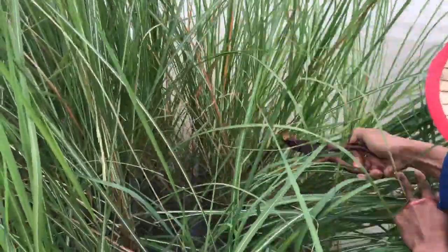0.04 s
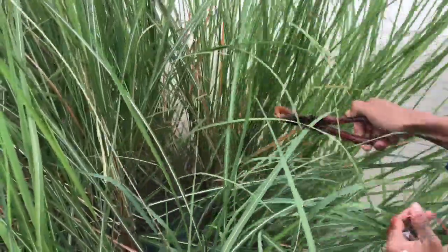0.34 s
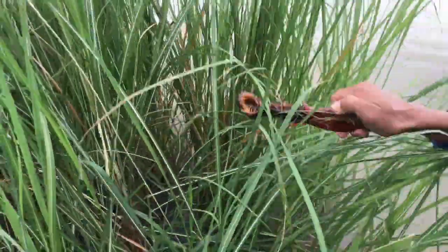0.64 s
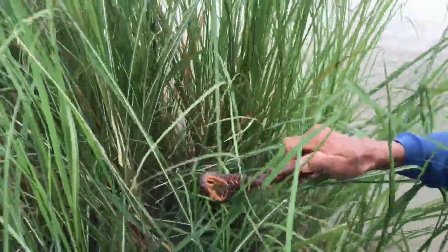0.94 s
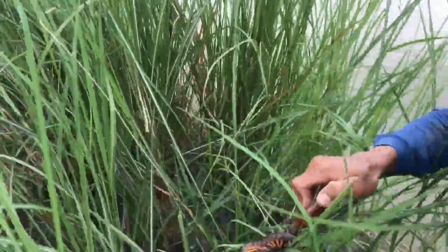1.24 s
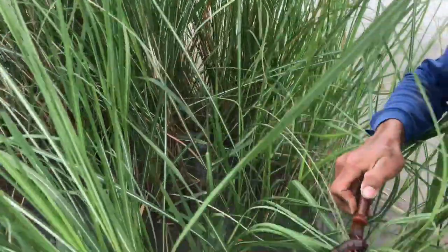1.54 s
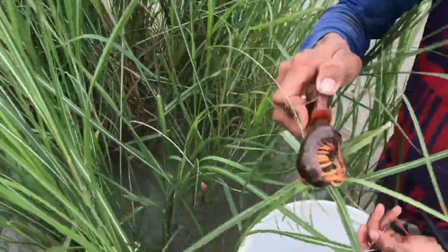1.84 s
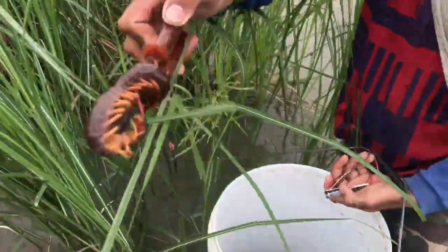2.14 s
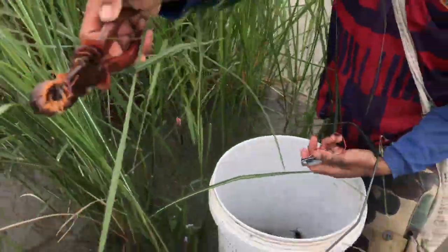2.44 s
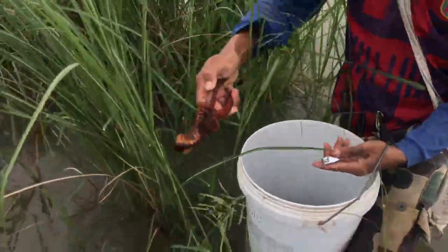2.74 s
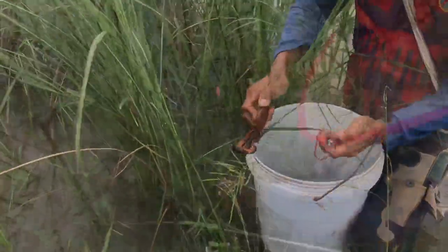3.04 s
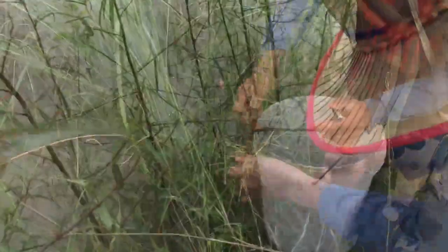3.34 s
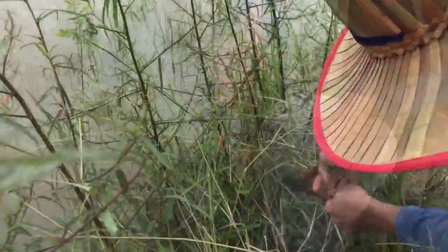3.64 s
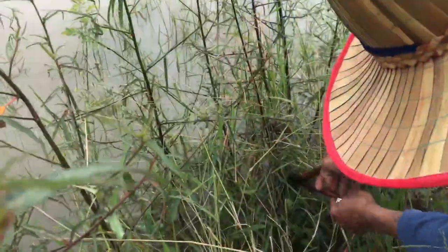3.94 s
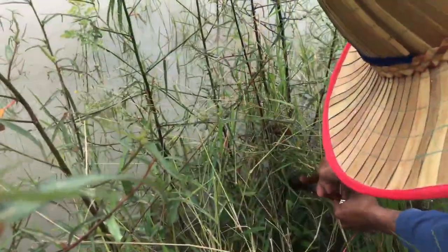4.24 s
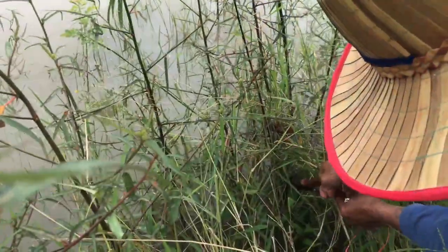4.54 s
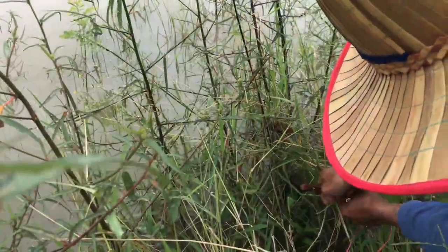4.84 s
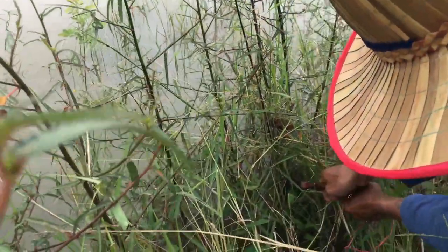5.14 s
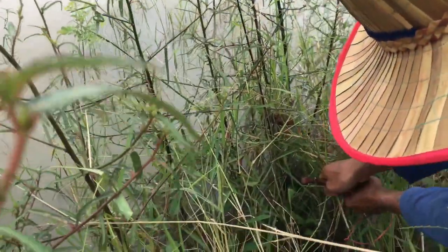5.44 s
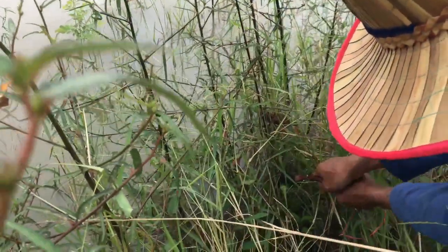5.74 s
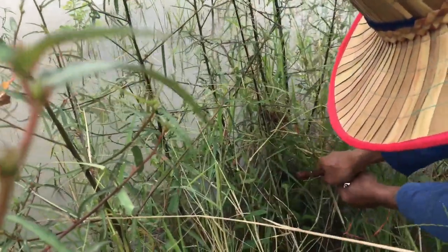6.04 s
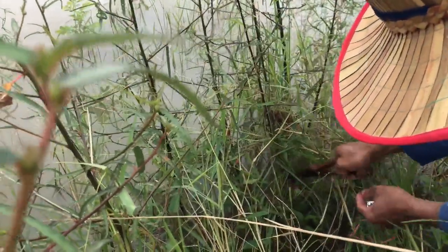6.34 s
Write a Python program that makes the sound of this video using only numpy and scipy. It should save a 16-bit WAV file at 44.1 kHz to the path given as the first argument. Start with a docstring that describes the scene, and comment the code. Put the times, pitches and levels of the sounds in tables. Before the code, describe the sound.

Close hiss of grass blades, snapping stems and splashing wading steps, fading to quiet ticks of hands probing a clump.

```python
"""Tall wet grass, close up in a flooded field, as someone wading draws metal tongs out of it.
Blades catch on each other and hiss past, stems snap, and water splats and plops round the legs.
Then hands probe a quieter clump: small stems crackle, an insect's wings tick, and something
wet sticks and slips in one squeak. One close mono microphone in the open, with light wind
and handling rumble on it."""
import sys
import numpy as np
from scipy import signal
from scipy.fft import rfft, irfft, next_fast_len
from scipy.io import wavfile
from scipy.ndimage import uniform_filter1d, map_coordinates

SR = 44100
rng = np.random.default_rng(int(sys.argv[2]) if len(sys.argv) > 2 else 0)


def generate_wav(sig):
    """Save sig (samples, or channels by samples) to the path in sys.argv[1] as 16-bit PCM at SR."""
    pcm = np.round(np.clip(np.atleast_2d(sig).T, -1, 1) * 32767).astype(np.int16)
    wavfile.write(sys.argv[1], SR, pcm)


N = 282240

# Levels in the tables are relative: each source applies its own gain.
# Steady push of blade on blade. Each row: time in seconds, level in dB.
BLADE_PUSH = [(0.0, -49.5), (1.35, -55), (1.89, -48.5), (2.16, -54.5), (2.44, -58.5), (2.65, -61),
              (2.85, -57), (3.17, -62.5), (3.3, -63), (3.9, -73.5), (4.56, -73.5), (4.79, -70.5),
              (5.2, -80.5), (5.81, -72), (5.93, -69), (6.4, -67.5)]
# Quick strokes through the grass. Each row: middle in seconds, level in dB, length in seconds.
GRASS_STROKES = [(0.138, -52, .08), (0.282, -53, 0.116), (0.539, -50, 0.045), (0.817, -54, 0.019),
                 (0.957, -54.5, 0.067), (1.363, -53.5, 0.052), (2.315, -54, .1), (2.807, -57.5, 0.33),
                 (2.893, -50, 0.036), (3.166, -54.5, .05), (3.255, -54, 0.018), (3.32, -53, 0.035),
                 (3.764, -64.5, 0.035), (5.897, -59, 0.088), (6.277, -66, .05)]
# Colour of sliding blades. Each row: frequency in Hz, level in dB.
BLADE_SPECTRUM = [(150, 12.5), (500, -3), (950, -3), (1500, 1.5), (2500, 2), (3700, 3.5), (6000, 1.5),
                  (9000, 2), (12500, 2), (15300, 1.5)]
# Sharp cracks: stems snapping and a few wet splats of water.
# Each row: start in seconds, level in dB, lower band edge in Hz.
SHARP_CRACKS = [(1.719, -34, 1500), (1.8313, -28.5, 6900), (1.9075, -27.5, 700), (2.0183, -22, 2960),
                (2.152, -24.5, 4380), (2.16, -23, 4000), (2.175, -28, 5000), (2.2145, -24.5, 4400),
                (3.144, -33, 1000), (4.7765, -45, 8000), (4.851, -45, 6000), (5.114, -34, 8450),
                (5.373, -46, 6000), (5.428, -45.5, 5000), (5.4819, -47, 7000), (5.531, -47.5, 7000),
                (5.817, -38, 6000), (5.9194, -40, 6000), (5.957, -41.5, 8000), (6.093, -41, 3500),
                (6.16, -38.5, 1500)]
# The largest air pockets. Each row: start in seconds, level in dB, pitch in Hz,
# cycles to fade by 60 dB, glide over that time as a share of the pitch.
AIR_POCKETS = [(1.718, -41.5, 1770, 45, 0.3), (1.79, -43, 1127, 53, 0.065), (1.817, -44, 452, 29, -0.065),
               (1.847, -33.5, 1480, 20, 0), (1.9075, -34.5, 2130, 28, 0.11), (1.91, -40.5, 678, 57, -0.35),
               (2.232, -42, 1630, 34, -0.093), (2.3412, -40, 1830, 42, 0), (3.008, -47.5, 1336, 140, .07),
               (3.022, -43, 896, 35, -.25), (3.1, -43, 1576, 42, 0.18), (3.1216, -39.5, 2420, 100, 0),
               (3.123, -37, 1070, 17, 0), (3.1426, -32, 913, 28, -0.27), (3.191, -43.5, 2630, 55, 0.037),
               (3.231, -43.5, 1170, 30, -.1), (3.243, -43, 6760, 95, 0.48), (3.283, -45, 512, 29, 1),
               (3.2944, -28.5, 769, 28, 0.82), (3.31, -45, 1397, 84, 0.36),
               (3.327, -39.5, 2760, 36, -0.038), (3.424, -46, 2190, 52, 0.2),
               (3.4534, -44.5, 2830, 37, -0.039), (3.5416, -51.5, 4900, 48, 0),
               (3.6252, -53.5, 2440, 130, -0.059)]
# Colour of a splash. Each row: frequency in Hz, level in dB.
SPLASH_SPECTRUM = [(300, -20), (1200, -5), (3000, -10), (6000, -12), (12000, -27)]
# A leg shoves the water. Each row: middle in seconds, level in dB, length in seconds.
LEG_SLOSHES = [(.75, -56, 0.18), (1.274, -57, 0.18), (1.737, -59, 0.083), (1.896, -57, 0.14),
               (2.221, -58, .1), (3.044, -49.5, 0.047), (3.154, -55, .06), (3.331, -57.5, .04),
               (3.443, -55, 0.054)]
# Water lapping round the legs. Each row: time in seconds, level in dB.
LAPPING = [(0.0, -62), (1.23, -57), (1.94, -56.5), (2.53, -64), (3.26, -55.5), (3.48, -65.5), (3.9, -85)]
# Colour of stirred water. Each row: frequency in Hz, level in dB.
WATER_SPECTRUM = [(200, 10), (340, 6), (480, -10.5), (700, -5.5), (950, 6.5), (1200, 0), (1800, 0.5),
                  (3000, 0.5), (6000, -30), (12000, -39)]
# Dull knocks. Each row: start in seconds, level in dB, pitch in Hz, seconds to fade by 60 dB.
KNOCKS = [(.948, -34.5, 207, 0.059), (0.9498, -31.5, 617, 0.013), (2.078, -38.5, 95, 0.099),
          (2.149, -36, 220, 0.044), (2.166, -27.5, 137, 0.037), (2.215, -34, 108, 0.035),
          (2.441, -41.5, 260, 0.076), (5.599, -43, 66, 0.16), (5.891, -39, 82, .077),
          (6.061, -42.5, 59.6, .094)]
# Ring of something hollow. Each row: frequency in Hz, level in dB, seconds to fade by 60 dB.
HOLLOW_MODES = [(700, -40.5, .022), (1350, -42, 0.021), (1770, -43, .014), (2230, -42, .015)]
# Bursts of an insect's wings. Each row: start in seconds, level in dB, length in seconds.
WING_BURSTS = [(4.885, -56, .04), (4.957, -52, 0.043)]
# Harmonics of the squeak. Each row: multiple of the pitch, level in dB.
SQUEAK_HARMONICS = [(1, -10.5), (2, 0), (3, -19)]
# Wind on the microphone. Each row: time in seconds, level in dB.
GUSTS = [(0.0, -54.5), (0.75, -53), (1.5, -50.5), (1.69, -54.5), (1.99, -48), (3.8, -57), (4.04, -54),
         (6.04, -54.5), (6.4, -55)]
# Colour of that wind. Each row: frequency in Hz, level in dB.
WIND_SPECTRUM = [(25, -59), (31, -34), (42, -5), (62, -2), (85, 0.5), (105, -4), (135, -1), (180, -8.5),
                 (280, -10.5), (400, -21.5), (600, -34), (1500, -48)]
# Murmur of open country. Each row: frequency in Hz, level in dB.
COUNTRY_SPECTRUM = [(100, -9), (300, 0), (500, -3), (800, -6.5), (1300, -10.5), (2200, -17.5), (5000, -20),
                    (15000, -19.5)]
# Notches of the microphone port. Each row: centre in Hz, width in Hz, depth in dB.
PORT_NOTCHES = [(4920, 170, 6.5), (7640, 340, 4), (10500, 670, 6.5)]


def grass(level_db=3, catches_per_s=3000, slips_per_s=60, crackle_db=-14.5):
    """Toothed blade edges catch on each other: a harder push makes more catches, merging into hiss."""
    push_db = with_strokes(curve(BLADE_PUSH), GRASS_STROKES)
    push = amp(push_db - push_db.max())
    catch_rate = catches_per_s * push
    teeth = unit(clicks(catch_rate, spread_db=-1) / np.sqrt(catch_rate))
    sliding = unit(rng.standard_normal(N) + teeth)
    # a whole blade slips free with a tiny, bright burst, which stands out most under a light push
    t = np.arange(SR // 200) / SR
    bursts = signal.fftconvolve(clicks(slips_per_s, spread_db=3.5) ** 2, amp(-60 * t / 0.0052))[:N]
    bright_noise = np.diff(rng.standard_normal(N + 1))
    crackle = unit(np.sqrt(np.abs(bursts)) * bright_noise) / push ** 0.1
    leaves = shifting_blades(sliding + amp(crackle_db) * crackle, depth_db=2.1)
    # a light touch moves only the fine tips, so it sounds thinner
    tips = 0.21 * (1 - push) ** 4 * np.diff(leaves, prepend=0)
    leaves = coloured(leaves + tips, BLADE_SPECTRUM)
    running_rms = np.sqrt(np.abs(uniform_filter1d(leaves ** 2, size=SR // 10)))
    flutter_db = 0.83 * wobble(70) + 1.15 * wobble(18)
    return leaves / running_rms * amp(push_db + level_db + flutter_db)


def shifting_blades(x, depth_db):
    """Different blades take over from moment to moment, each with its own colour."""
    spectra = signal.stft(x, nperseg=256)[2]
    patches = uniform_filter1d(rng.standard_normal(spectra.shape), size=3, axis=0)
    patches = uniform_filter1d(patches, size=8, axis=1)
    return signal.istft(spectra * amp(depth_db * unit(patches)), nperseg=256)[1][:N]


def cracks(tail_db=-9, click_db=-3, t60=0.022, probing_s=(4.2, 6.4), twig_db=-53, twig_hz=5000, count=14):
    """Stems snap and water splats, each a sharp click with a rough tail; thin stems sound only high."""
    out, t = np.zeros(N), np.arange(SR // 20) / SR
    envelope = amp(tail_db - 60 * t / t60) * (1 - np.exp(-t / 0.000048))
    # hands in the clump tick small stems
    starts = rng.uniform(*probing_s, count)
    twigs = [(s, twig_db + 4 * size, twig_hz) for s, size in zip(starts, rng.standard_normal(count))]
    for s, db, low_hz in SHARP_CRACKS + twigs:
        grit = unit(rng.standard_normal(len(t)) * amp(4 * rng.uniform(-1.6, 1.6, len(t))))
        crack = envelope * grit
        add(crack, 0.001, amp(click_db) * np.array([1, -1]))
        b, a = signal.butter(2, min(low_hz, SR / 4), "highpass", fs=SR)
        add(out, s, amp(db) * signal.lfilter(b, a, crack))
    return out


def plops(level_db=3.5, splash_db=-9, spray_db=-12, scatter=0.46):
    """Each air pocket swells within a cycle, splashes, and throws off a spray of later bubbles."""
    bubbles, splash, t = np.zeros(N), np.zeros(N), np.arange(SR // 8) / SR
    for s, db, hz, cycles, rise in AIR_POCKETS:
        t60 = cycles / hz
        add(bubbles, s, amp(db) * ring(hz, t60, rise, attack_s=0.58 / hz))
        envelope = amp(db + splash_db - 60 * t / (2 * t60)) * (1 - np.exp(-t / 0.0023))
        add(splash, s, envelope * rng.standard_normal(len(t)))
        for lag, size in zip(rng.random(size=8), rng.standard_normal(size=8)):
            small_hz = min(hz * np.exp(lag + scatter * size), SR / 4)  # later ones are smaller, so higher
            add(bubbles, s + lag * t60, amp(db + spray_db - 0.6 * lag) * bubble(small_hz, 25, rise))
    return amp(level_db) * bubbles + coloured(splash, SPLASH_SPECTRUM)


def droplets(level_db, middle_hz, cycles, count, spread_db=3, scatter=0.5):
    """Each slosh throws a handful of bubbles or drops of chance size, most of them at its height."""
    out = np.zeros(N)
    for s, db, length in LEG_SLOSHES:
        for when, pitch, size in np.clip(rng.standard_normal((count, 3)), -2, 2):
            hz = min(middle_hz * np.exp(scatter * pitch), SR / 4)
            gain = amp(db + level_db + spread_db * size)
            add(out, s + when * length / 3, gain * bubble(hz, cycles, rise=0.27))
    return out


def gurgle(middle_s=2.45, spread_s=0.4, level_db=-48, middle_hz=324, count=14):
    """Deep water closes behind the step: big, slow air pockets wobble under the surface."""
    out = np.zeros(N)
    for when, pitch, size in np.clip(rng.standard_normal((count, 3)), -2, 2):
        pocket = bubble(middle_hz * np.exp(0.253 * pitch), cycles=24, rise=0.1)
        add(out, middle_s + when * spread_s, amp(level_db + 2 * size) * pocket)
    return out


def wash(level_db=-4, settle_db_per_s=15, middle_hz=1300, count=2200):
    """Stirred water: a soft wash full of faint bubbles, settling once the wading stops."""
    still_s = np.maximum(np.arange(N) / SR - LAPPING[-1][0], 0)
    stir_db = with_strokes(curve(LAPPING) - settle_db_per_s * still_s, LEG_SLOSHES)
    fizz, starts = np.zeros(N), rng.uniform(0, N / SR, count)
    for s, pitch, size in zip(starts, rng.standard_normal(count), rng.rayleigh(1, count)):
        hz = min(middle_hz * np.exp(0.6 * pitch), SR / 4)
        add(fizz, s, size * bubble(hz, cycles=40, rise=0.11))
    water = noise(WATER_SPECTRUM) + unit(coloured(fizz, WATER_SPECTRUM))
    return unit(water) * amp(stir_db + level_db)


def thumps(level_db=3.5):
    """Soft low bumps, a few cycles long."""
    out = np.zeros(N)
    for s, db, hz, t60 in KNOCKS:
        add(out, s, amp(db + level_db) * ring(hz, t60, rise=0, attack_s=0.0013))
    return out


def tap(start_s=1.127, level_db=3):
    """A light blow on something hollow rings for an instant."""
    out = np.zeros(N)
    for hz, db, t60 in HOLLOW_MODES:
        add(out, start_s, amp(db + level_db) * ring(hz, t60, rise=0, attack_s=0.00082))
    return out


def insect(level_db=-3, low_hz=11000, high_hz=13100, wing_hz=186, sounding_share=0.7):
    """Wing strokes set a narrow, very high resonance buzzing."""
    strokes = np.zeros(N)
    for start, db, length in WING_BURSTS:
        for k, (chance, size) in enumerate(zip(rng.random(size=12), rng.standard_normal(size=12))):
            if k / wing_hz < length and chance < sounding_share:
                strokes += amp(db + 2 * size) * swell(start + k / wing_hz, length_s=0.0028)
    resonance = unit(filtered(rng.standard_normal(N), lambda hz: (hz > low_hz) & (hz < high_hz)))
    return amp(level_db) * strokes * resonance


def squeak(middle_s=5.893, length_s=0.025, level_db=-41, light_touch_hz=2070, sag_hz=115):
    """Wet surfaces stick and slip; the slips slow down and brighten while the pressure is highest."""
    pressure = swell(middle_s, length_s)
    hz = light_touch_hz - sag_hz * swell(middle_s, 0.65 * length_s)
    phase = 2 * np.pi * np.cumsum(hz * (1 + 0.0025 * wobble(490))) / SR
    out = np.zeros(N)
    for k, db in SQUEAK_HARMONICS:
        envelope = pressure ** (0.47 if k == 1 else 1)  # the fundamental outlasts its overtones
        out += amp(level_db + db) * envelope * np.sin(k * phase)
    return out


def air(country_db=-68):
    """Low wind on the microphone over the steady murmur of open country."""
    rumble = amp(curve(GUSTS)) * noise(WIND_SPECTRUM)
    return rumble + amp(country_db) * noise(COUNTRY_SPECTRUM)


def hum(hz=85, middle_s=1.73, length_s=3.6, level_db=-55.5, waver_db=2):
    """A faint, wavering low hum swells once and fades."""
    phase = 2 * np.pi * np.cumsum(hz * (1 + 0.029 * wobble(6))) / SR
    return np.sin(phase) * amp(level_db + waver_db * wobble(2.03)) * swell(middle_s, length_s)


def bubble(hz, cycles, rise):
    """A damped air pocket whose pitch glides as its shape and depth change."""
    return ring(hz, cycles / hz, rise, attack_s=1 / hz)


def ring(hz, t60, rise, attack_s):
    """A tone that fades by 60 dB in t60 seconds while its pitch glides by the share rise."""
    t = np.arange(SR // 8) / SR
    pitch = hz * (1 + rise * np.minimum(t / t60, 1))
    return np.sin(2 * np.pi * np.cumsum(pitch) / SR) * amp(-60 * t / t60) * (1 - np.exp(-t / attack_s))


def clicks(per_second, spread_db):
    """Random impulses of either sign with log-normal sizes."""
    fires = rng.random(N) < per_second / SR
    return fires * rng.choice([-1, 1], N) * amp(spread_db * np.clip(rng.standard_normal(N), -2, 2))


def swell(middle_s, length_s):
    """A smooth rise and fall, peak 1."""
    return np.exp(-np.minimum((2 * (np.arange(N) / SR - middle_s) / length_s) ** 2, 50))


def with_strokes(steady_db, strokes):
    """A steady level in dB with the power of short strokes added."""
    stroke_power = sum((amp(db) * swell(s, length)) ** 2 for s, db, length in strokes)
    return 10 * np.log10(amp(steady_db) ** 2 + stroke_power)


def curve(rows):
    """One value per sample from (seconds, value) points."""
    return np.interp(np.arange(N) / SR, *np.transpose(rows))


def wobble(rate):
    """A smooth random curve, rate knots a second."""
    return map_coordinates(rng.standard_normal(int(N * rate / SR) + 4), [np.arange(N) * rate / SR])


def noise(spectrum):
    """Coloured noise at rms 1."""
    return unit(coloured(rng.standard_normal(N), spectrum))


def coloured(x, spectrum):
    """x shaped by (Hz, dB) points on a log axis."""
    points_hz, db = np.transpose(spectrum)
    return filtered(x, lambda hz: amp(np.interp(np.log(hz + 1), np.log(points_hz), db)))


def filtered(x, response):
    """x through a gain that depends on frequency."""
    size = next_fast_len(N + SR // 2)
    return irfft(rfft(x, size) * response(np.fft.rfftfreq(size, 1 / SR)), size)[:N]


def add(track, s, sound):
    """Mix a short sound into the track at time s."""
    part = track[max(round(s * SR), 0):][:len(sound)]
    part += sound[:len(part)]


def amp(db):
    """Decibels to gain."""
    return 10 ** (np.asarray(db) / 20)


def unit(x):
    """Scale to rms 1."""
    return x / np.sqrt(np.mean(x ** 2) + 1e-20)


def scene():
    """Everything reaches one close microphone in the open field, with no walls to answer."""
    froth = droplets(level_db=2, middle_hz=1600, cycles=43, count=16)
    spatter = droplets(level_db=4, middle_hz=4230, cycles=16, count=12)
    water = plops() + froth + spatter + gurgle() + wash()
    mono = grass() + cracks() + water + thumps() + tap() + insect() + squeak() + air() + hum()
    return np.array([mono, mono])


def record(dry):
    """The microphone port cuts a few notches; nothing passes above the band limit."""
    def microphone(hz, top_hz=15850):
        cut_db = sum(db / (1 + (2 * (hz - centre) / width) ** 2) for centre, width, db in PORT_NOTCHES)
        return amp(-cut_db) * (hz < top_hz)
    return np.array([filtered(side, microphone) for side in dry])


dry = scene()
out = record(dry)
generate_wav(out)
```